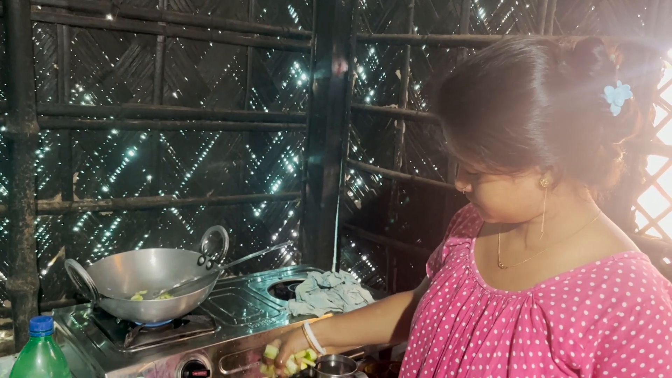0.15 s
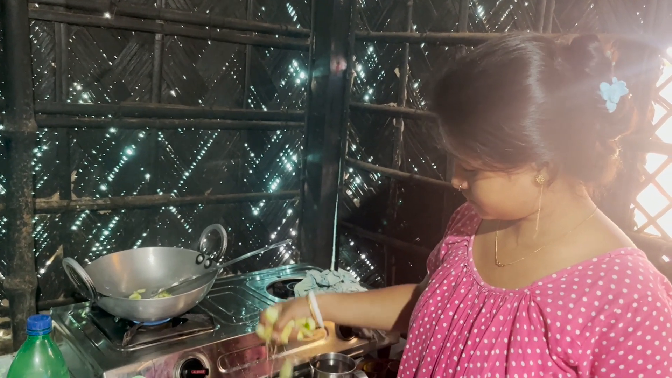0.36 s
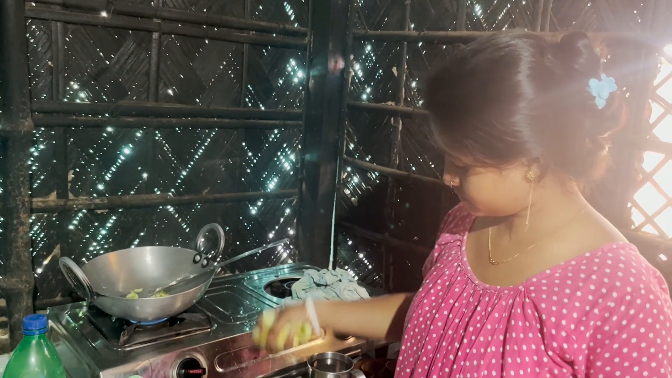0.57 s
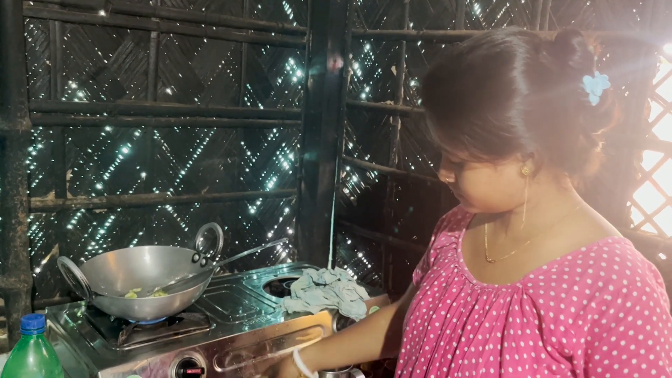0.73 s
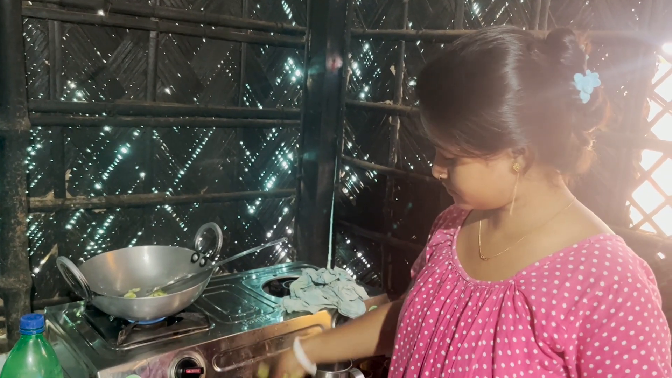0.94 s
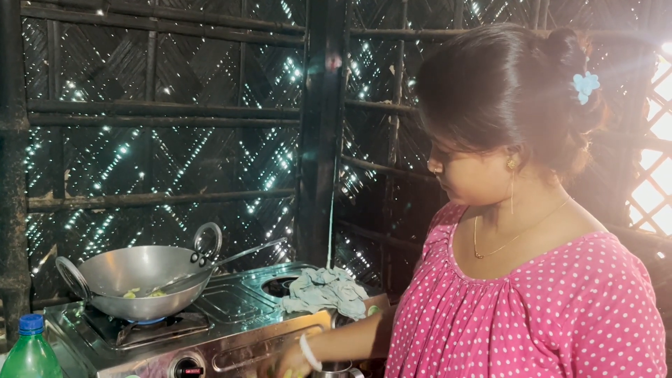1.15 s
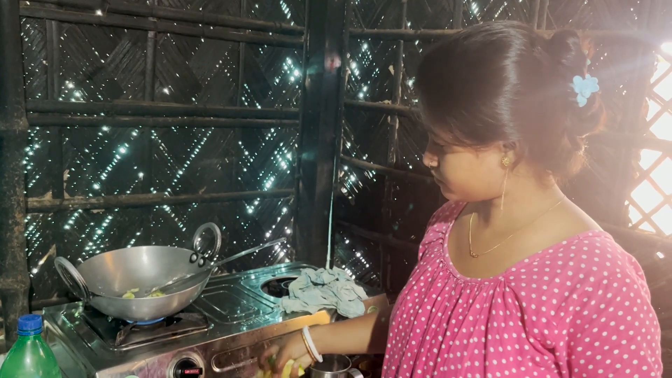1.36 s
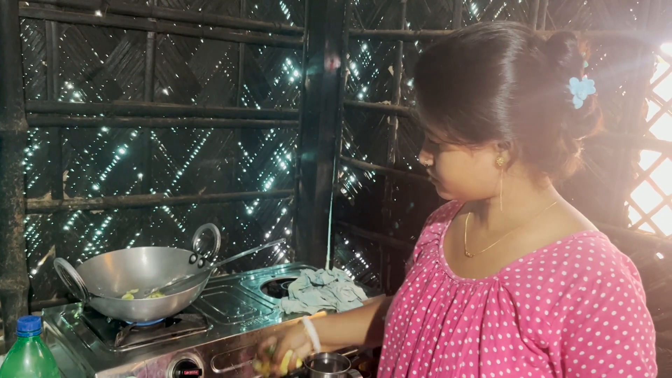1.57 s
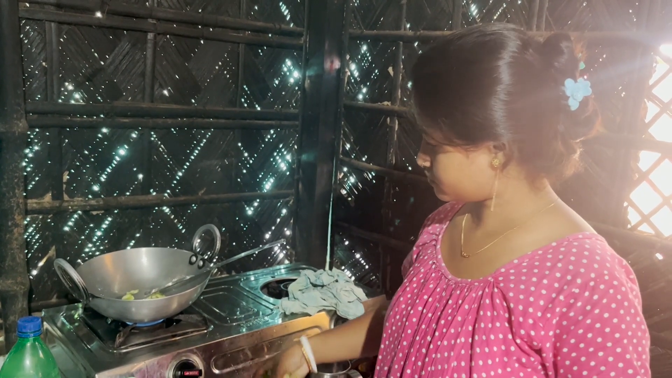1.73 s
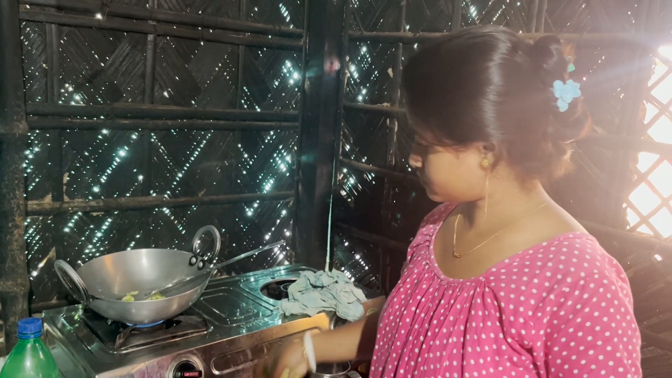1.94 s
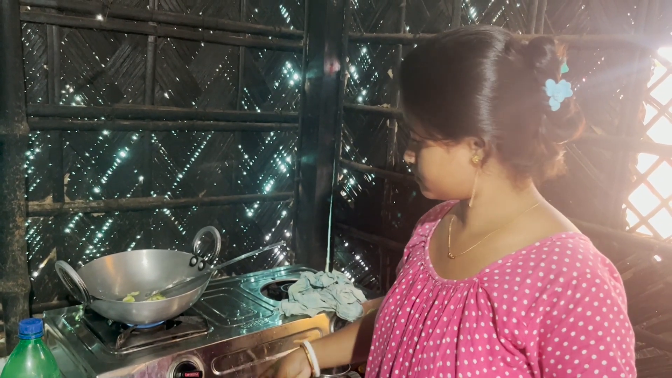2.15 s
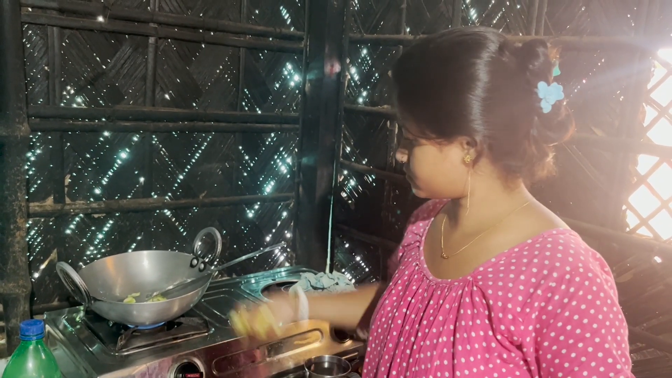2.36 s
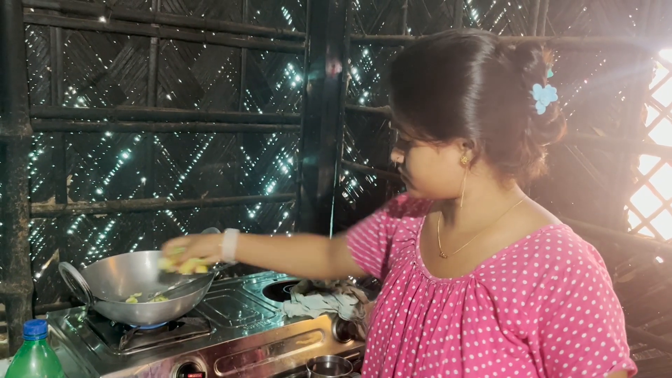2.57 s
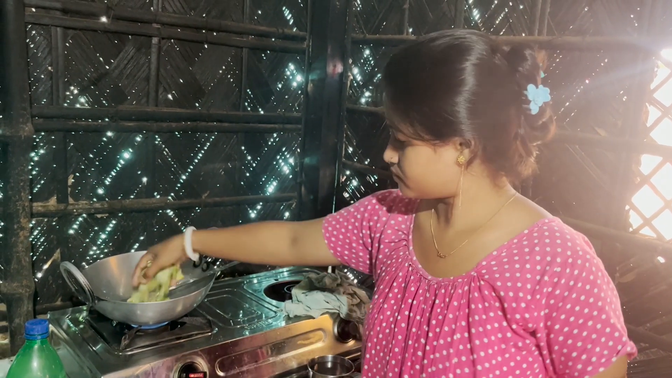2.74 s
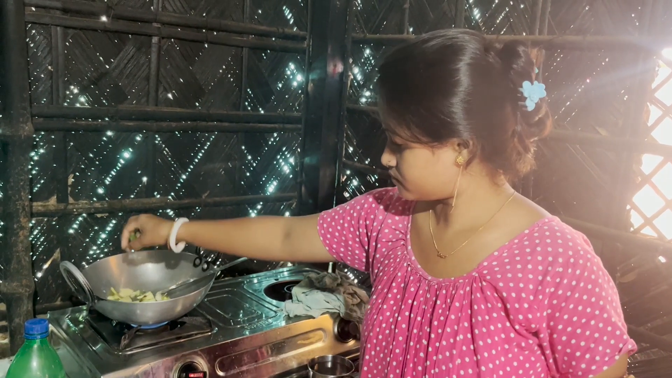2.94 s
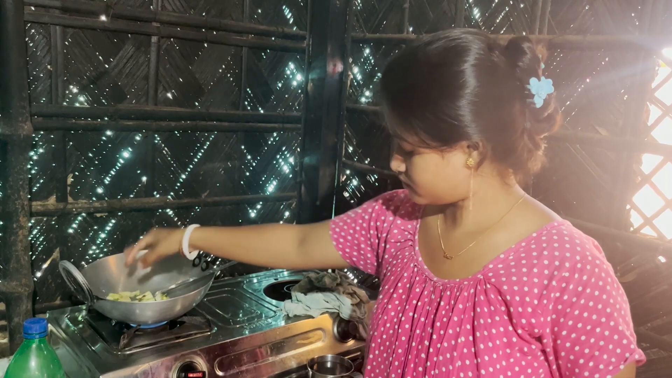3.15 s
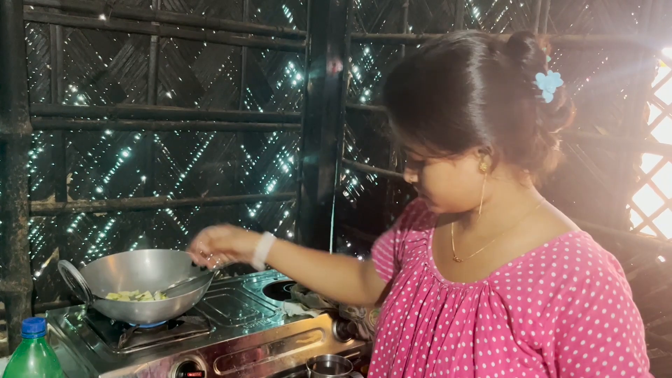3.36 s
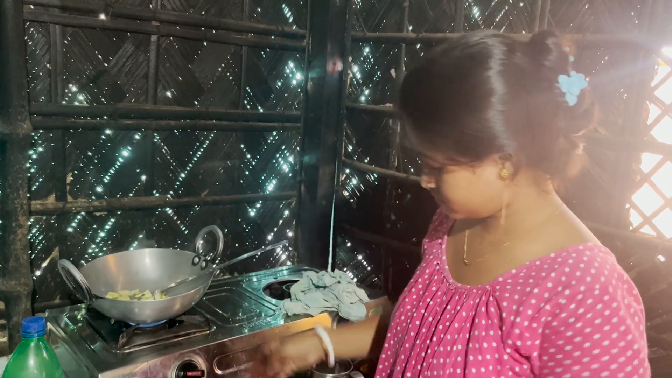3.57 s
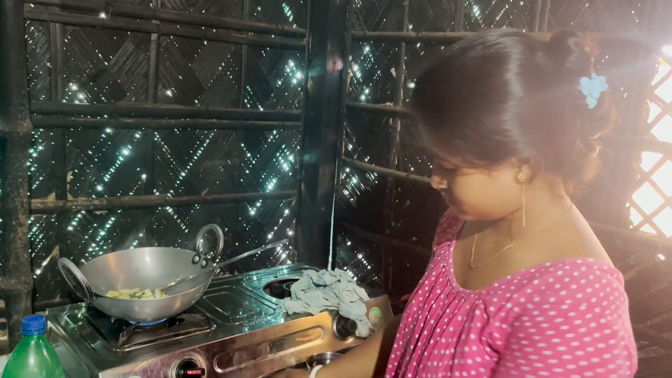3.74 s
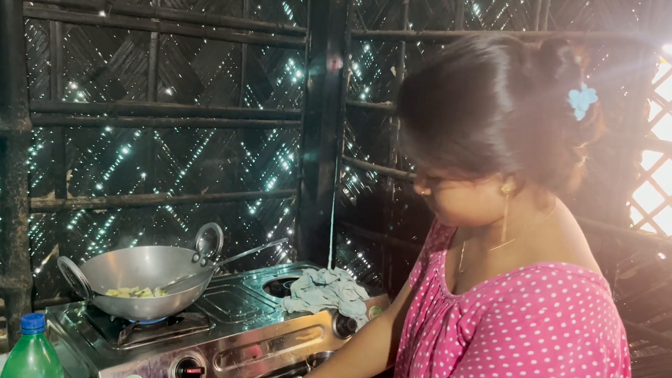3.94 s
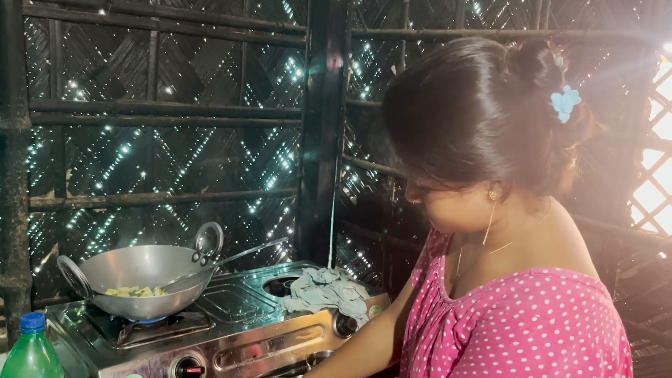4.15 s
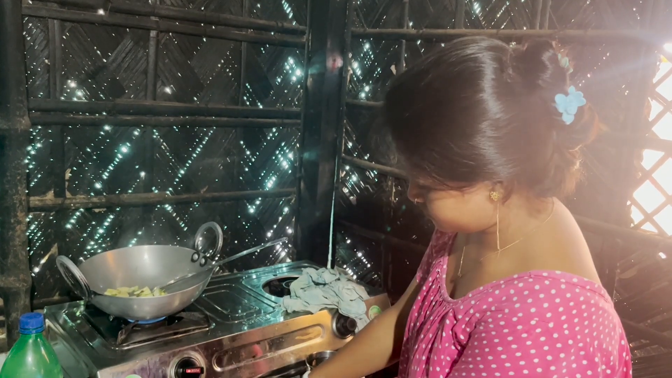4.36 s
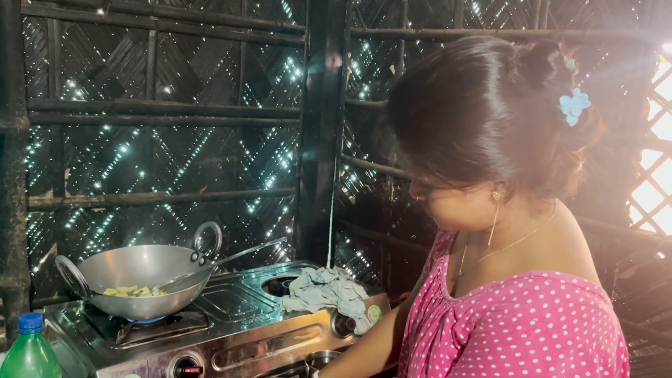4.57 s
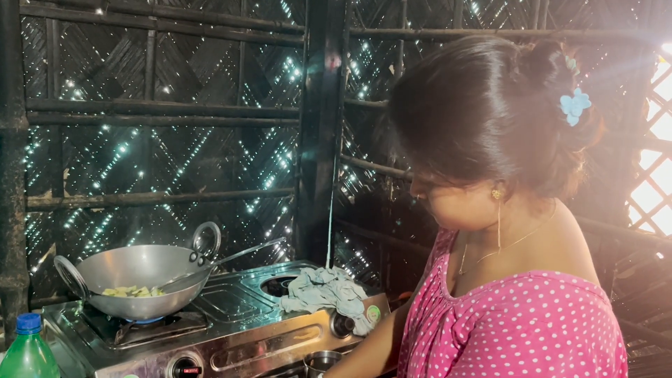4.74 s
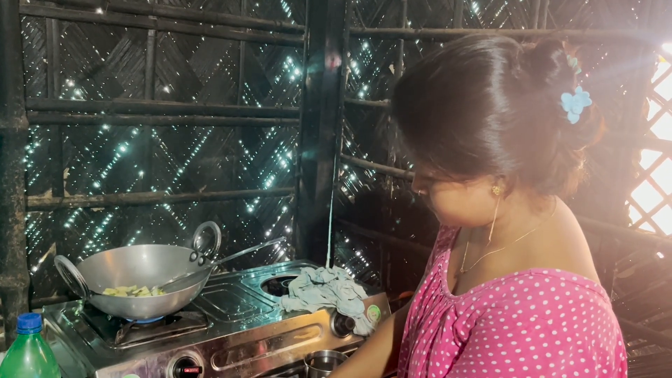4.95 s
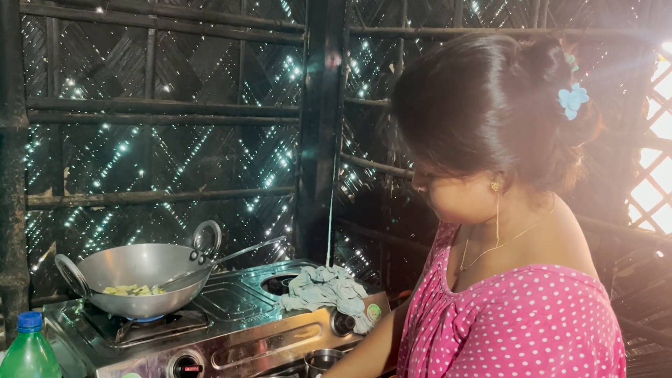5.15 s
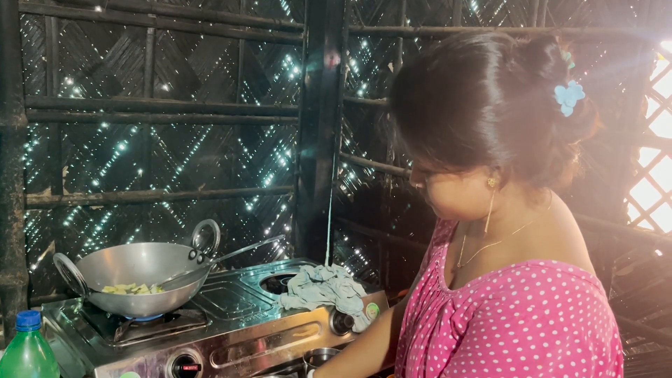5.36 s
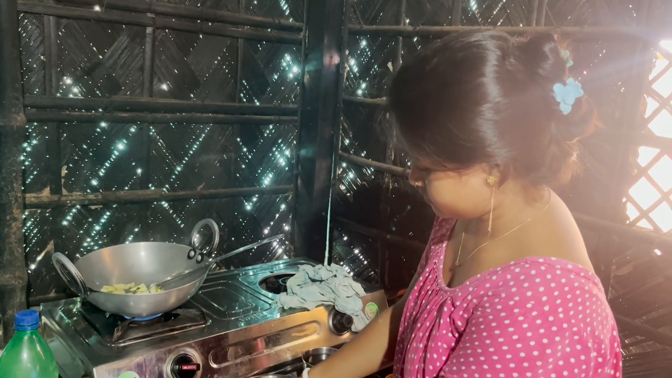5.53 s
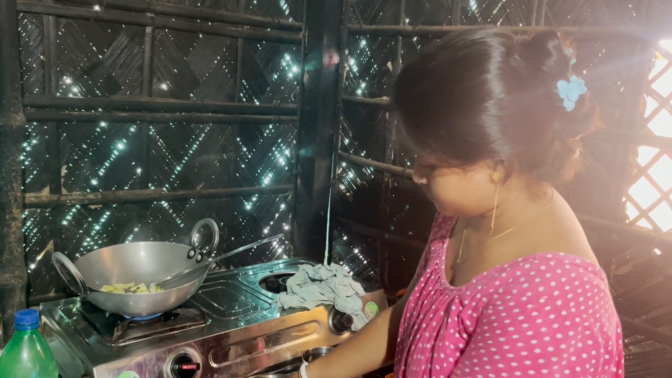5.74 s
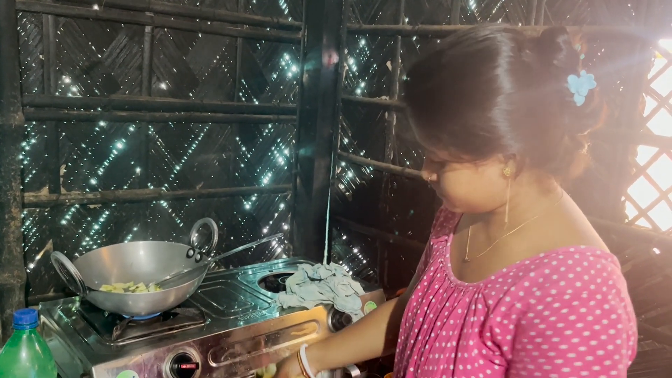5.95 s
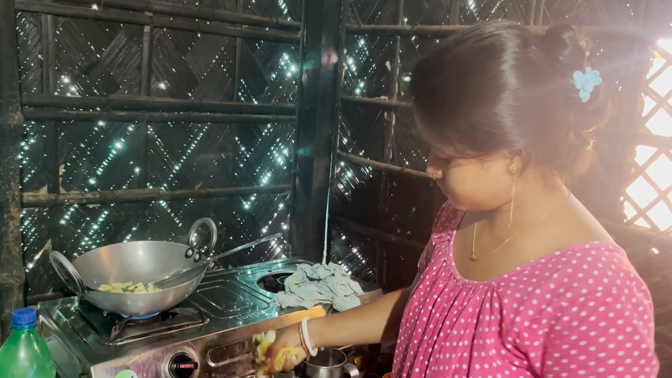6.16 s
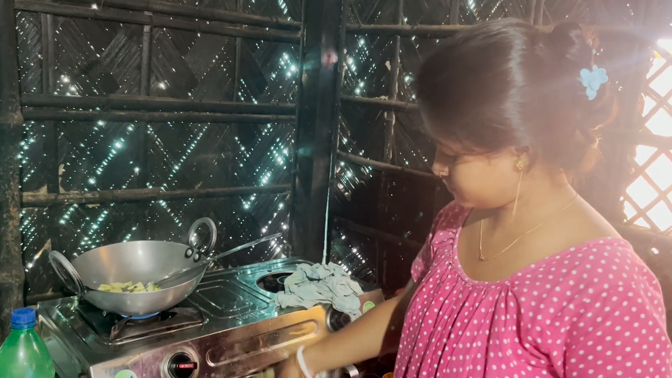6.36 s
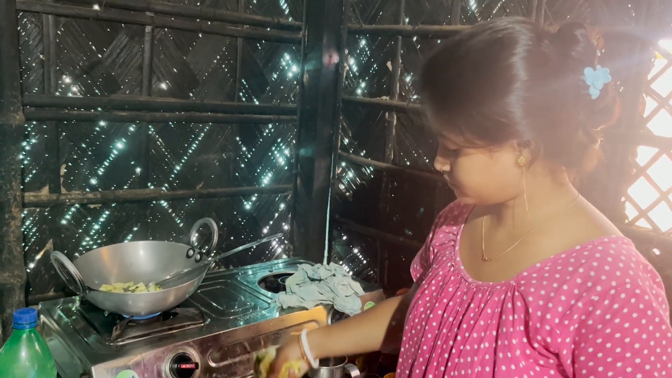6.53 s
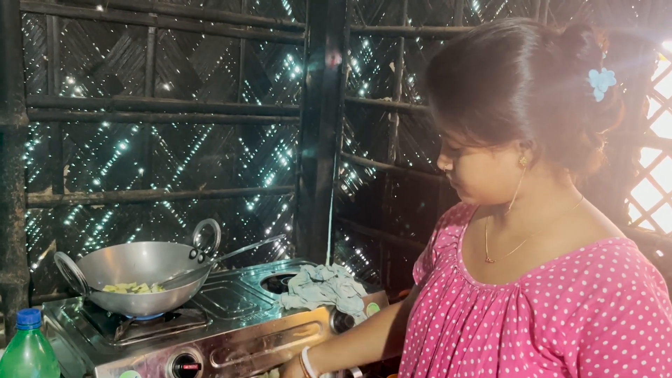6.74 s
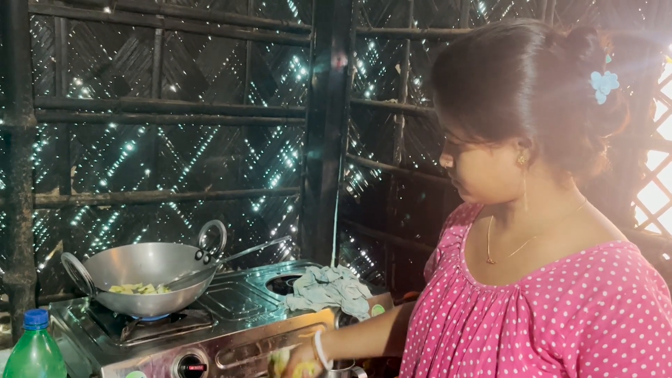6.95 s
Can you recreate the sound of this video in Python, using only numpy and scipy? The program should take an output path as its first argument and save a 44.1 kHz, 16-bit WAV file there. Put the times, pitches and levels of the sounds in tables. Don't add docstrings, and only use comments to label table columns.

```python
import sys
import numpy as np
from scipy import signal
from scipy.fft import rfft, irfft
from scipy.io import wavfile
from scipy.ndimage import uniform_filter1d

SR = 44100
rng = np.random.default_rng(int(sys.argv[2]) if len(sys.argv) > 2 else 0)


def voltage_ratio(decibels):
    exponent = np.asarray(decibels, float) / 20
    return 10 ** exponent


def store_pcm(level_fs):
    pcm = np.round(np.clip(level_fs, -1, 1) * 32767).astype(np.int16)
    wavfile.write(sys.argv[1], SR, np.atleast_2d(pcm).T)


N = 313110
T = np.arange(N) / SR
HZ = np.maximum(np.fft.rfftfreq(N, 1 / SR), 1)


def level(x, db):
    return x * voltage_ratio(db) / np.sqrt(np.mean(x ** 2))


def colour(x, table):
    hz, db = np.transpose(table)
    gain_db = np.interp(np.log(HZ), np.log(hz), db)
    return irfft(rfft(x) * voltage_ratio(gain_db), N)


def band(x, lo_hz, hi_hz):
    return signal.sosfilt(signal.butter(2, [lo_hz, hi_hz], "band", fs=SR, output="sos"), x)


def scatter(rate, spread_db):
    when, size, sign = rng.random((3, N))
    height = voltage_ratio(-spread_db * np.log(1 - size))
    return (when < rate / SR) * height * np.sign(sign - .5)


def puffs(rate, spread_db, fade_s, depth):
    onsets = scatter(rate, spread_db) ** 2
    power = signal.lfilter([1], [1, -np.exp(-1 / (fade_s * SR))], onsets)
    share = np.clip(depth, 0, 1)
    return np.sqrt(1 - share + share * power / power.mean())


def wander(rate):
    k = int(SR / rate)
    steps = np.repeat(rng.standard_normal(600), k)[:N]
    drift = uniform_filter1d(steps, k)
    return drift / drift.std()


def swells(events):
    t = T[::64]
    total_db = 0
    for at, db, length in events:
        phase = np.clip((t - at) / (2 * length), -.5, .5)
        total_db = total_db + db * np.cos(np.pi * phase) ** 2
    return np.interp(T, t, total_db)


def burst(events, crack, trim_db, span=1.46):
    length = 6000
    t = T[:length]
    chance = rng.standard_normal((len(events), 2, length))
    out = np.zeros((2, N + length))
    for (s, db, hz, t60), noise in zip(events, chance):
        excitation = noise + crack * (t == 0)
        shape = band(excitation, hz / span, hz * span) * voltage_ratio(-60 * t / t60)
        start = int(s * SR)
        out[:, start:start + length] += shape * voltage_ratio(db + trim_db) / abs(shape).max()
    return out[:, :N]


def burner():
    # f/Hz, level/dB
    flame = [(12, -54), (20, -23), (60, -5), (86, 2), (109, -3), (129, -38), (150, -10), (348, -15),
             (380, -22.5), (400, -14), (520, -39), (880, -120)]
    # centre t/s, level change/dB, length t/s
    draughts = [(.57, 6, .1), (1.26, -4, .06), (2.14, 0, 0.17), (2.31, -3, .06), (2.73, -4, 0.054),
                (2.85, 6, 0.078), (3.06, -3, .1), (3.91, -11, .08), (4.13, 5, .08), (4.47, -7, .06),
                (4.7, -3.5, .2), (5.65, -2, .08), (5.91, -3, .08), (6.25, -3, .07), (6.58, -7, .04),
                (6.72, 2, .12)]
    mid = colour(rng.standard_normal(N), flame)
    side = colour(rng.standard_normal(N), flame)
    hum = voltage_ratio(-6.5) * np.sin(2 * np.pi * 120.0 * T)
    both = level(mid, 0.24) + hum + level(side, -14.5) * np.array([[1], [-1]])
    flutter_db = 1.4 * wander(rate=14)
    return both * voltage_ratio(-41 + swells(draughts) + flutter_db)


def vessels():
    # start t/s, length t/s, f/Hz, level/dB
    rings = [
        (.93, .42, 699, -45),
        (2.17, .4, 743, -44),
    ]
    out = 0
    for s, length, hz, db in rings:
        swell = np.sin(np.pi * np.clip((T - s) / length, 0, 1)) ** .5
        out = out + voltage_ratio(db) * np.sin(2 * np.pi * hz * T) * swell
    return out


def landings():
    # t/s, peak level/dB, centre f/Hz, decay T60 t/s
    impacts = [
        (2.758, -22, 500, .15),
        (2.775, -14.5, 900, .2),
        (2.80, -15, 780, .24),
        (2.779, -15, 2800, .12),
        (2.825, -26, 100, .2),
    ]
    return burst(impacts, crack=3.0, trim_db=-7, span=1.4)


def spits():
    # t/s, peak level/dB
    fine_drops = [(0.0608, -2), (0.3526, 0), (0.3985, -13), (0.7163, -6), (1.0321, -3), (1.0755, 0),
                  (1.1086, -3), (1.7514, -4), (1.8746, -5), (2.2683, -3), (2.3067, 2), (2.8384, -6.5),
                  (2.9871, -3), (3.0385, -7), (3.0959, -10), (3.262, -2), (3.3238, -2), (3.4625, -9),
                  (3.6446, -7), (4.0522, -3), (4.6593, 4), (5.143, -8), (5.5413, -2), (5.632, -8),
                  (5.662, -5), (6.3415, -6), (6.3879, -6), (6.6408, -0.5)]
    # t/s, peak level/dB
    middling_drops = [(0.3222, -8.5), (0.3586, -8), (0.3965, -7), (0.5073, -8), (0.8094, -8), (1.076, -17),
                      (1.4092, -9), (1.5196, -10), (1.6397, -11), (2.3042, -6), (2.7144, -7), (2.901, -7),
                      (2.9946, -12), (3.309, -6), (3.5205, -8), (3.56, -13), (3.7394, -0.5), (3.7994, -3),
                      (4, -9), (4.1694, -3), (4.3665, -3), (4.7065, -1.5), (5.1597, -3), (5.4098, -8),
                      (5.5393, -11), (5.763, -10), (5.8897, -8), (6.1102, -2.5), (6.2194, -6),
                      (6.6413, -2.5)]
    # t/s, peak level/dB, centre f/Hz
    steam_pockets = [(3.083, -17, 603), (3.162, -14, 606), (3.326, -20, 1010), (3.378, -13, 608),
                     (3.548, -11, 600), (3.667, -21, 563), (3.727, -12.5, 598), (3.906, -6, 1080),
                     (4.071, -12, 990), (4.128, -13.5, 985), (4.318, -12, 1080), (4.418, -29, 592),
                     (4.48, -19, 598), (4.559, -11, 860), (4.65, -12, 869), (5.109, -21, 643),
                     (5.158, -17, 630), (5.441, -22, 608), (5.538, -15.5, 626), (6.11, -17, 856),
                     (6.156, -18, 638), (6.264, -16, 643), (6.34, -17, 600), (6.615, -27, 600)]
    # t/s, peak level/dB, centre f/Hz
    large_bubbles = [(0.1999, -21, 2020), (0.8759, -18, 2720), (1.036, -12, 2000), (1.4106, -13.5, 1930),
                     (2.2697, -14.5, 1940), (2.4488, -16, 2180), (3.0852, -4, 2200), (3.1822, -5, 2690),
                     (3.436, -2, 2810), (3.5635, -2.5, 2450), (3.6634, -6, 2220), (3.7998, 0.5, 2160),
                     (3.908, -11, 2250), (3.9482, -13, 2020), (4.105, -10, 2160), (4.2775, -7, 2210),
                     (4.3368, -4.5, 2700), (4.5645, -4.5, 2090), (4.6522, -8, 1840), (4.8444, -7, 2140),
                     (5.021, -9, 2160), (5.1587, -11, 2670), (5.314, -9, 2160), (5.6319, -6, 2020),
                     (5.7, -10.5, 2050), (5.894, -12, 2770), (6.1576, -10, 2680), (6.2185, -3.5, 2650),
                     (6.2775, -9.5, 2130), (6.3387, -11.5, 2060)]
    fine_drops = [(s, db, 10600, 0.048) for s, db in fine_drops]
    middling_drops = [(s, db, 5340, 0.062) for s, db in middling_drops]
    steam_pockets = [(s, db, hz, 0.062) for s, db, hz in steam_pockets]
    large_bubbles = [(s, db, hz, 0.053) for s, db, hz in large_bubbles]
    spray = burst(fine_drops, crack=3.4, trim_db=-1.0)
    spit = burst(middling_drops, crack=5.1, trim_db=1.0)
    thud = burst(steam_pockets, crack=3.8, trim_db=-6.5, span=1.52)
    pop = burst(large_bubbles, crack=6.0, trim_db=0.5, span=1.8)
    return spray + spit + thud + pop


def sizzle():
    # t/s, sizzle level/dB, wetness of the pieces (0-1)
    boil = [(0, -19.5, .1), (.5, -19.5, 0.17), (1.3, -21.5, 0.22), (2.2, -22.5, 0.33), (2.72, -24, 0.06),
            (2.8, -19, 0.8), (2.93, -19, 0.25), (3.1, -12.5, 0.58), (3.45, -10.5, 0.64), (3.8, -14.5, 1),
            (4.3, -16.5, 1.1), (4.68, -17, 0.88), (4.76, -17, 0.8), (5.6, -18, 0.75), (6.2, -19, 0.77),
            (7.1, -20, 0.64)]
    # centre t/s, level rise/dB, length t/s
    surges = [(0.069, 0.5, 0.055), (0.205, 2.5, 0.044), (0.357, 0.5, 0.054), (0.416, 2.5, .05),
              (.52, 2.5, 0.045), (0.695, 1.5, 0.055), (0.966, 4, 0.048), (1.1, 3.5, 0.051), (1.298, 1, .1),
              (1.426, 4, 0.035), (1.54, 2.5, 0.063), (1.65, 3.5, .06), (1.76, 5, 0.03), (1.86, 2, 0.047),
              (2.026, 6.5, 0.034), (2.3, 6, 0.033), (2.498, 2.5, 0.13), (2.982, 1.5, 0.05),
              (4.35, 1.5, 0.037), (4.66, 1, 0.11), (5.173, 3.5, 0.022), (5.425, 1, 0.04), (5.55, 1, 0.036),
              (5.964, 2, 0.12), (6.105, 1.5, 0.13), (6.223, 2, 0.055), (6.354, 2, 0.026), (6.635, 0, .05),
              (6.77, 2, 0.069), (6.964, 2.5, .07)]
    # f/Hz, level/dB
    fizz = [(130, -13.5), (310, -21.5), (500, -14), (800, -11.5), (1050, -11), (1500, -6.5), (1800, -6),
            (2500, -5), (4100, -6), (5200, -2.5), (6800, -2.5), (9000, 0), (12500, -4), (15500, -6.5)]
    s, boil_db, wetness = np.transpose(boil)
    wet = np.interp(T, s, wetness)
    surge_db = swells(surges)
    stir_per_s = 24
    top_db = np.interp(T, s, boil_db) + surge_db - 0.06 * wander(stir_per_s)
    large = wander(stir_per_s) - 0.35 * surge_db
    body_db = -11 + 7 * wet + 0.5 * large
    low_db = -21.5 + 4.5 * wet + 0.67 * (large + wander(stir_per_s)) / np.sqrt(2)
    sizes = [(7800, 17200, top_db + 1, 13000, 1.93),
             (3430, 7480, top_db - 3, 9000, 1.6),
             (1190, 4170, top_db + body_db - 1.5, 6000, 2.02),
             (130, 1100, top_db + low_db - .5, 2500, 2.83)]
    gust = puffs(rate=35, spread_db=1.0, fade_s=0.023, depth=0.26)
    out = 0
    for lo_hz, hi_hz, db, rate, spread_db in sizes:
        cracks = []
        for path in range(2):
            clicks = band(scatter(rate, spread_db), lo_hz, hi_hz)
            cracks.append(level(colour(clicks, fizz), 0))
        flicker = puffs(rate=60, spread_db=0.25, fade_s=0.0049, depth=0.21)
        out = out + np.array(cracks) * voltage_ratio(db) * flicker
    lone = level(colour(scatter(300, 2.76), fizz), -11.5) * voltage_ratio(top_db)
    return out * gust + np.array([lone, np.roll(lone, 140)])


def pan(x):
    # f/Hz, bandwidth/Hz, level/dB
    modes = [(391, 6.1, 4.5), (500, 16, 1.5), (604, 45, 5), (782, 17, -1), (858, 21, 3.5), (990, 17, 0.5),
             (1108, 24, 0), (1297, 39, 2.5), (1472, 33, -5), (1633, 33, -2), (1713, 23, 1),
             (1876, 32, -1.5), (2044, 57, -2.5), (2183, 43, -1), (2766, 32, 2.5), (3084, 44, -5),
             (3410, 30, -11), (4640, 14, 5)]
    ring = sum(voltage_ratio(db) / (1 + 2j * (HZ - hz) / width) for hz, width, db in modes)
    return irfft(rfft(x) * (1 + ring), N)


def kitchen(near):
    tail = band(rng.standard_normal((2, 8000)), 110, 3270) * voltage_ratio(-60 * T[:8000] / 0.22)
    tail = tail / np.sqrt(np.sum(tail ** 2))
    return signal.fftconvolve(near, tail, axes=1)[:, :N]


def ports(direct, scattered):
    # f/Hz, phase lead of the right port/rad, left over right level/dB, coherence (0-1)
    port_table = [(60, 0, 2, .95), (300, 0.45, 2, 0.7), (1190, -1.3, 2.5, 0.35), (1596, -1.7, 0, 0.33),
                  (1790, 0, 2, 0.93), (2334, 1, -1, 0.89), (2800, -1.6, 6, 0.57), (3800, 2, 4.5, 0.42),
                  (4900, -0.63, 6.5, 0.43), (6790, 1.79, 0.5, 0.8), (8290, 3, 1, .93),
                  (11770, 6.5, -2, .93), (12900, 6.8, 0.5, 0.95), (14700, 8.65, -.5, .97),
                  (15300, 9.3, 0, 1)]
    hz, lead, left_db, like = np.transpose(port_table)
    lead = np.interp(HZ, hz, lead)
    left_db = np.interp(HZ, hz, left_db)
    like = np.interp(HZ, hz, np.clip(like, 0, 1))
    straight = rfft(direct)
    shared = like * np.exp(1j * lead) * straight
    unlike = np.sqrt(1 - like ** 2) * rfft(scattered)
    left = straight * voltage_ratio(left_db / 2)
    right = (shared + unlike) * voltage_ratio(-left_db / 2)
    return irfft(np.array([left, right]), N)


def scene():
    oil = sizzle() + spits() + landings()
    near = pan(oil) * voltage_ratio(0.84)
    direct, scattered = near + voltage_ratio(-18) * kitchen(near)
    return ports(direct, scattered) + burner() + vessels()


def joint(x, drop_db):
    edges_hz = [1700, 1900, 2100, 2330, 2580, 7600, 7900, 8200, 8550, 8900, 11020, 11550, 12400, 13050,
                14500, 14850, 15150, 15800]
    mid_side = np.array([x[0] + x[1], x[0] - x[1]]) / 2
    hz, _, z = signal.stft(mid_side, SR, "cosine", nperseg=2048)
    for lo, hi in zip(edges_hz, edges_hz[1:]):
        rows = (hz >= lo) & (hz < hi)
        size = np.sqrt(np.sum(abs(z[:, rows]) ** 2, axis=1))
        z[:, rows] *= (size > voltage_ratio(drop_db) * size[::-1])[:, None]
    mid, side = signal.istft(z, SR, "cosine", nperseg=2048)[1][:, :N]
    return np.array([mid + side, mid - side])


def roll_off(x):
    return signal.sosfilt(signal.butter(12, 15660, fs=SR, output="sos"), x)


def record(dry):
    low_pass = signal.ellip(10, .2, 70, 15760, fs=SR, output="sos")
    cut = signal.sosfilt(low_pass, dry)
    mix = np.clip(joint(cut, drop_db=-10), -1, 1)
    return roll_off(mix)


dry = scene()
out = record(dry)
store_pcm(out)
```